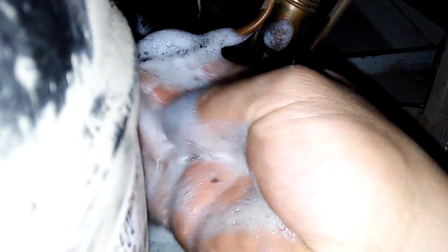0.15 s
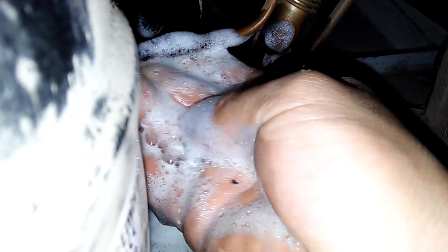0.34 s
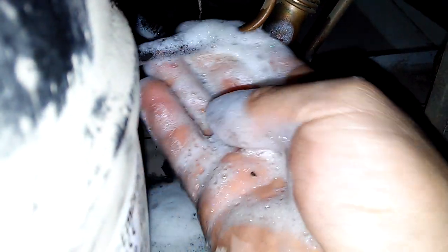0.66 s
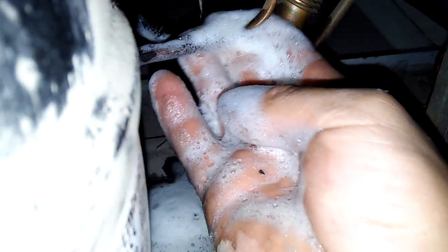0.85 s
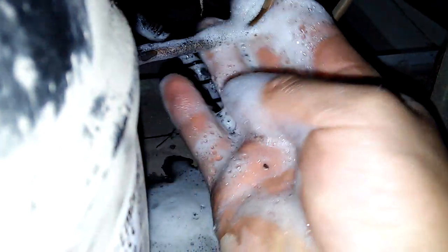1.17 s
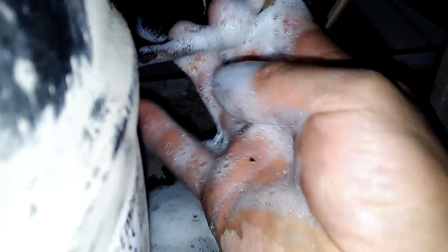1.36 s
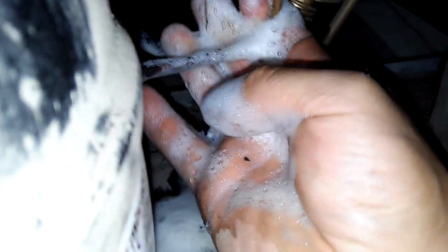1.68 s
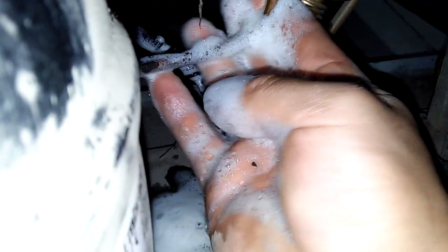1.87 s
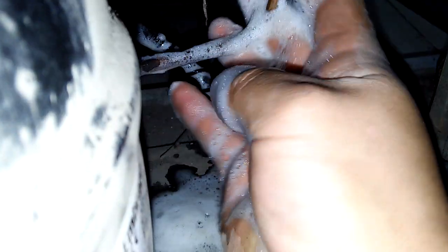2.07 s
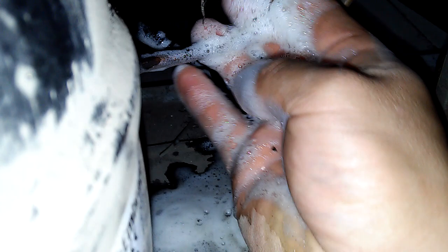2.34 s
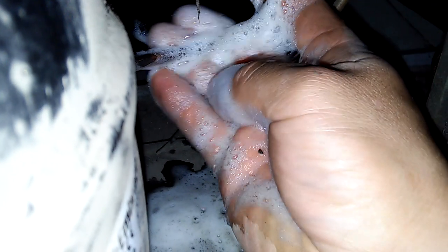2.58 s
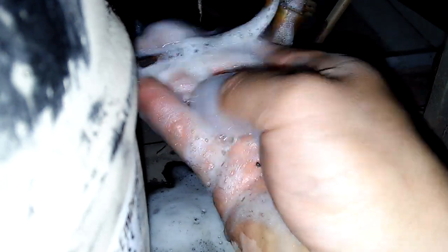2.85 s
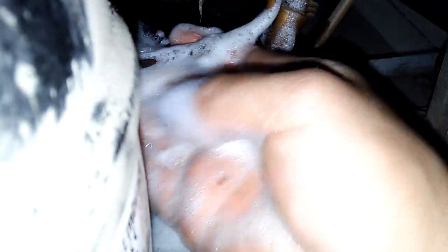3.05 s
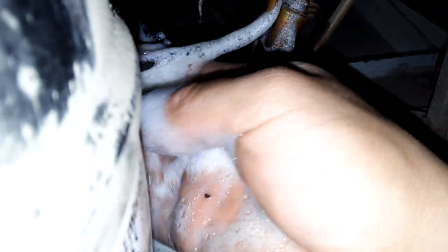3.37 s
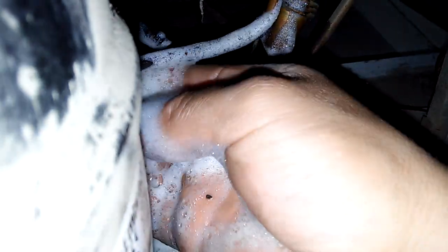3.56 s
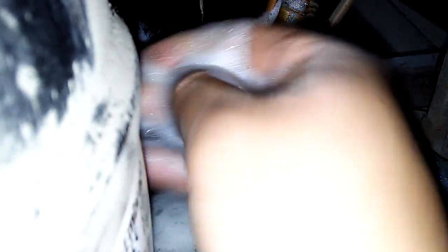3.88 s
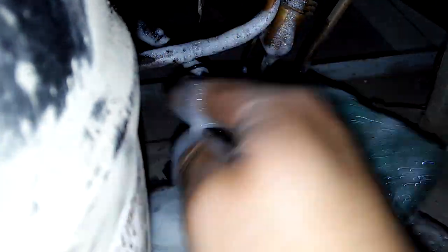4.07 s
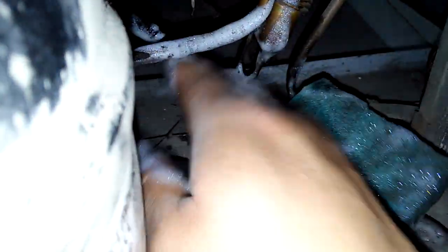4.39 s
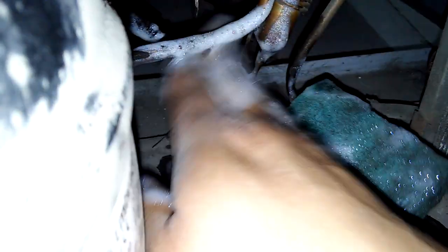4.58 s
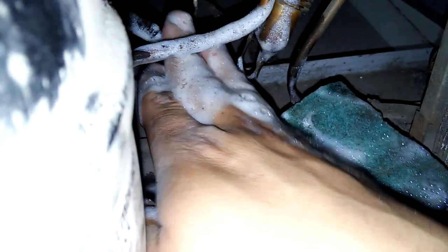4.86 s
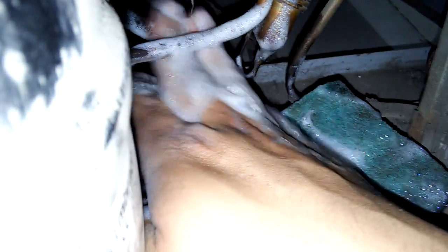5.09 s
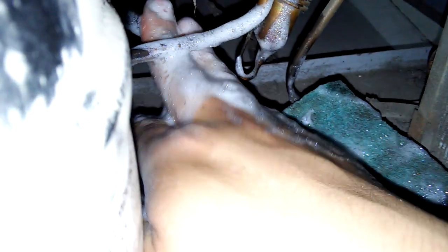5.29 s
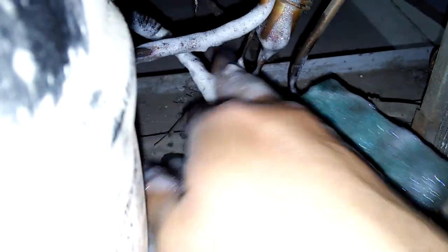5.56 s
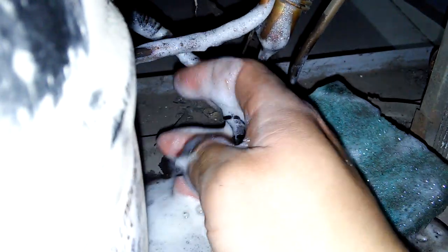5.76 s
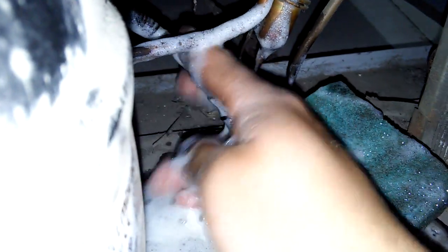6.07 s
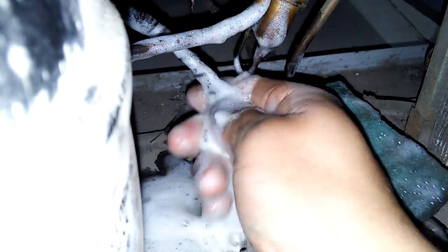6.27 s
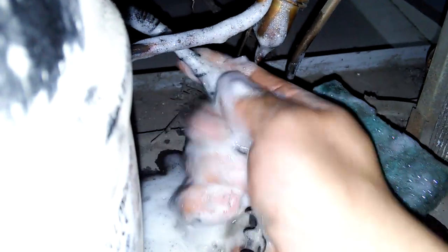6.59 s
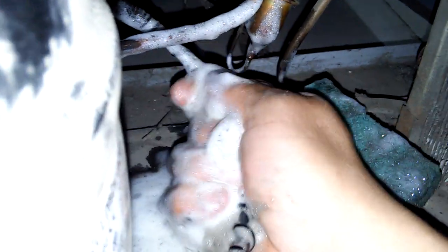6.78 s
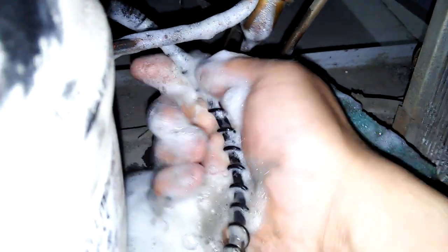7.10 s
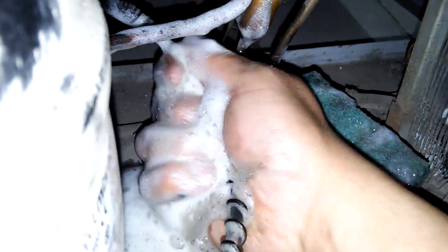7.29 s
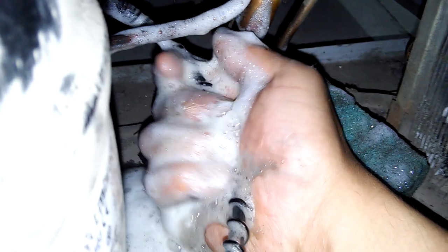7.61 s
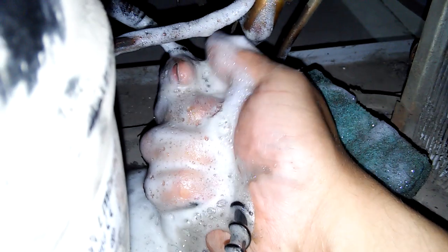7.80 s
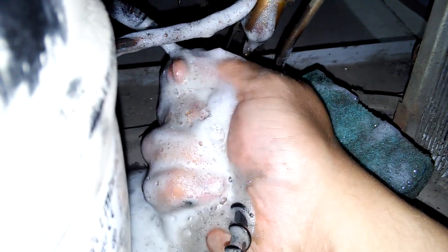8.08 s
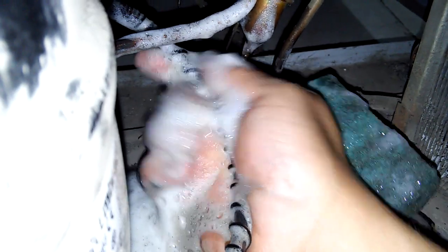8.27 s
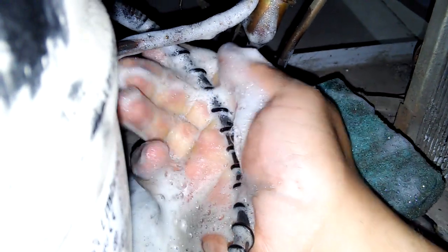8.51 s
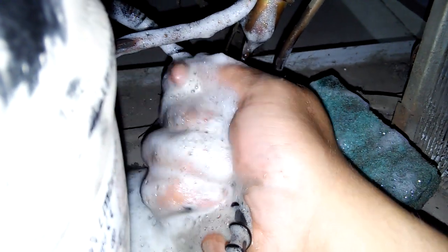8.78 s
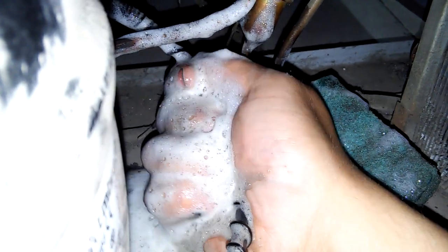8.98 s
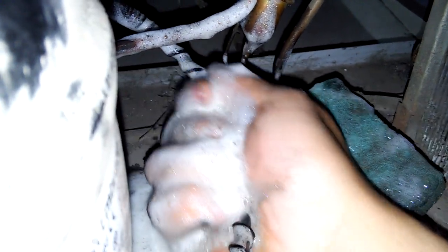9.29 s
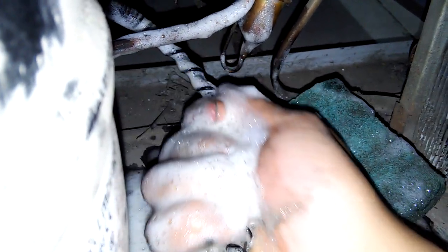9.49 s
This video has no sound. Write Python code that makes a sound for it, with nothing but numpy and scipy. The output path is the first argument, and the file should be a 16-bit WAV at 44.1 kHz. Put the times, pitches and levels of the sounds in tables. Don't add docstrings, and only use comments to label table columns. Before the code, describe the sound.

Close bright hiss of bursting suds under a rubbing hand, a hard metallic rattle early on, then softer clinks and dull distant thuds.

```python
import sys
import numpy as np
from scipy import signal
from scipy.fft import rfft, irfft, next_fast_len
from scipy.io import wavfile
from scipy.ndimage import uniform_filter1d, map_coordinates

SR = 44100
rng = np.random.default_rng(int(sys.argv[2]) if len(sys.argv) > 2 else 0)


def bounce(signal):
    frames = np.transpose(np.atleast_2d(signal))
    limited = np.clip(frames, -1, 1)
    pcm = np.round(limited * 32767).astype(np.int16)
    wavfile.write(sys.argv[1], SR, pcm)


def makeup_ratio(level_db):
    decades = np.asarray(level_db, float) / 20
    return 10 ** decades


N = 425565

# f/Hz, width/Hz, level/dB
TUBE_MODES = [(1340, 36, -9.5), (1698, 39, -12), (1783, 22, -10.5), (1993, 36, -6.5), (2340, 30, -7),
              (2503, 39, -7), (2700, 37, -9), (3030, 25, -15), (3340, 53, -2), (3940, 43, -6.5),
              (4200, 27, -12), (4950, 34, -6), (5560, 56, -15), (6480, 57, -1)]
# f/Hz, level/dB
SCRAPE_COLOUR = [(710, -17), (1200, -27), (1360, -34), (1550, -11), (1770, -4), (2140, -1.5), (4040, 8),
                 (5330, 1), (13000, 1), (15600, -32)]


def unit(x):
    return x / np.sqrt(np.mean(x ** 2) + 1e-20)


def along(points, hz):
    f, value = np.transpose(points)
    return np.interp(np.log(hz + 1), np.log(f + 1), value)


def curves(rows):
    s, *columns = np.transpose(rows)
    return [np.interp(np.arange(N) / SR, s, column) for column in columns]


def bells(rows):
    t = np.arange(0, N + 64, 64) / SR
    total = sum(high * np.exp(-((t - s) / half) ** 2) for s, high, half in rows)
    return np.interp(np.arange(N) / SR, t, total)


def wobble(rate):
    knots = rng.standard_normal(int(N * rate / SR) + 4)
    return map_coordinates(knots, [np.arange(N) * rate / SR])


def filtered(x, response):
    m = next_fast_len(N + SR // 2)
    return irfft(rfft(x, m) * response(np.fft.rfftfreq(m, 1 / SR)), m)[..., :N]


def resonance(f, hz, width):
    return 1j * f * width / (hz * hz - f * f + 1j * f * width)


def chord(f, peaks, spread_db):
    total = 0
    for k, (hz, width, level_db) in enumerate(peaks):
        strength = makeup_ratio(level_db + rng.normal(0, spread_db))
        total = total + (-1) ** k * strength * resonance(f, hz, width)
    return total


def patchy(patch_db):
    z = signal.stft(rng.standard_normal(N + 512), nperseg=512)[2]
    field = uniform_filter1d(rng.standard_normal(z.shape), size=5, axis=0)
    field = uniform_filter1d(field, size=12, axis=1)
    return unit(signal.istft(z * makeup_ratio(patch_db * unit(field)), nperseg=512)[1][:N])


def puff(t, colour, attack, t60):
    hiss = irfft(rfft(rng.standard_normal(len(t))) * colour, len(t))
    hiss = hiss * makeup_ratio(-60 * t / t60) * (1 - np.exp(-t / attack))
    return hiss / abs(hiss).max()


def gliding(x, hz, width):
    f, t, z = signal.stft(x, SR, nperseg=512)
    centre = hz[np.minimum((t * SR).astype(int), N - 1)]
    lift = makeup_ratio(-13) + abs(resonance(f[:, None], centre, width)) ** 2
    return signal.istft(z * lift, SR, nperseg=512)[1][:N]


def struck(at, db, modes, own_hz, free, attack, t60):
    out, t = np.zeros(N + SR), np.arange(SR // 2) / SR
    for s, level_db, hz, share in np.broadcast(at, db, own_hz, free):
        ring = np.zeros(len(t))
        for f, mode_db, life in [*modes, (hz, 0, t60)]:
            fade_db = 60 * t / (share * life)
            ring += makeup_ratio(mode_db + rng.normal(0, 1.0) - fade_db) * np.sin(2 * np.pi * f * t)
        ring = ring * (1 - np.exp(-t / attack))
        out[round(s * SR):][:len(t)] += makeup_ratio(level_db) * ring / abs(ring).max()
    return out[:N]


def nook(x):
    # f/Hz, t60/s
    gap_decay = [(100, 0.76), (1000, 0.31), (5000, 0.083), (15000, 0.14)]
    hz, t, z = signal.stft(rng.standard_normal(SR // 3), SR, nperseg=256)
    fade_db = -60 * t / along(gap_decay, hz)[:, None]
    tail = signal.istft(z * makeup_ratio(fade_db), SR, nperseg=256)[1]
    return signal.fftconvolve(x, tail / np.linalg.norm(tail))[:N]


def walls(x):
    # delay/s, level/dB
    surfaces = [(.00117, -13), (.00231, -11), (.00373, -11), (.00519, -12), (.00691, -13), (.00929, -15)]

    def echoes(reach):
        return filtered(x, lambda f: sum(makeup_ratio(db) * np.exp(-2j * np.pi * f * s * reach) for s, db in surfaces))

    turn = np.pi / 4 * (1 + np.tanh(2 * wobble(1.2)))
    return x + np.cos(turn) * echoes(1) + np.sin(turn) * echoes(1.137)


def shop():
    # t/s, rumble level/dB
    activity = [(0, -51), (.25, -68), (1.5, -65.5), (3.3, -62.5), (4.55, -57.5), (5.05, -63.5), (5.5, -57),
                (6.2, -57), (6.7, -50), (7.2, -51), (7.6, -52.5), (8.6, -48.5), (9.65, -47)]
    # f/Hz, level/dB
    rumble_colour = [(21, -46), (35, -11), (70, -1.5), (113, -1), (166, -5.5), (216, -14.5), (281, -14),
                     (346, -13), (377, -14), (412, -40), (480, -26), (620, -66), (1060, -120)]
    # f/Hz, level/dB
    murmur_colour = [(100, -55), (170, -5), (316, -1), (352, 1.5), (388, -2.5), (436, 1), (456, -11.5),
                     (546, -7), (670, -10), (821, -11.5), (1180, -15), (2200, -28), (2860, -59),
                     (4840, -120)]
    # f/Hz, width/Hz, level/dB
    room_modes = [(280, 3.2, -1.5), (396, 11, -5), (546, 21, 0.5), (737, 11.5, 3), (839, 30, 0.5),
                  (973, 17, 0.5), (82.6, 2.9, 4.5), (114, 12, -11), (148.3, 5.7, 1)]

    def room_sound(patch_db, colour):
        def response(f):
            standing = 1 + sum(abs(resonance(f, hz, w)) ** 2 * makeup_ratio(db) for hz, w, db in room_modes)
            return standing * makeup_ratio(along(colour, f))
        return unit(filtered(patchy(patch_db), response))

    rumble_db, = curves(activity)
    murmur_db = -62.5 + 0.36 * (rumble_db + 57.5)
    rumble = makeup_ratio(rumble_db + 2.06 * wobble(8)) * room_sound(1.0, rumble_colour)
    murmur = makeup_ratio(murmur_db + 1.3 * wobble(11.0)) * room_sound(0.67, murmur_colour)
    return rumble + murmur


def thuds():
    # t/s, peak level/dB, f/Hz
    pushes = [(.003, -39, 160), (5.515, -51, 312), (8.11, -46, 282), (8.201, -45, 280), (6.923, -66, 91),
              (7.886, -40.5, 104), (7.954, -46, 89), (8.052, -40, 129), (8.099, -39, 140), (8.273, -38, 80),
              (8.454, -47, 81.5), (8.582, -39.5, 91), (8.871, -44, 75), (9.201, -42, 147), (9.545, -36, 80)]
    s, db, hz = np.transpose(pushes)
    floor_mode = (271.5, -15.5, 0.091)  # Hz, dB, t60 s
    return struck(s, db, [floor_mode], hz, 0.96, attack=0.0055, t60=0.069)


def cabinet():
    # t/s, peak level/dB, low-mode level/dB, loudest mode f/Hz, share of the free ring time
    knocks = [(0.019, -67, 24, 940, 0.52), (1.7265, -20, -22, 795, 0.9), (1.741, -35, -29, 720, 0.6),
              (2.575, -46, -27, 780, 0.25), (2.599, -40, -8, 789, 0.89), (2.689, -47, -5, 864, 1),
              (6.489, -50.5, -13, 846, 0.96), (6.575, -52, -21, 790, 0.63), (6.653, -54.5, -18, 840, 1),
              (9.298, -50, -5, 814, 1), (9.33, -45, -1.5, 815, 1), (9.355, -44.5, -14, 790, 0.55),
              (9.425, -56, 14, 820, 0.78)]
    taps = [
        (5.52, -57, 4, 1030, 0.2),
        (6.131, -56, -3, 770, 0.4),
        (6.155, -50.5, -14, 1030, 0.18),
        (7.507, -48, -1, 745, 0.3),
    ]
    # f/Hz, level/dB, t60/s
    panel_modes = [(727, -7, 0.28), (812, -2, 0.22), (554.7, -11.5, 0.13)]
    # t/s, peak level/dB, loudest mode f/Hz
    bumps = [(0.004, -48, 139), (0.05, -60, 106), (0.759, -44, 94), (1.726, -31.5, 104), (1.767, -45, 124),
             (2.563, -34.5, 107), (2.604, -26.5, 107), (2.641, -25.5, 102.3), (2.677, -28, 111),
             (5.244, -43.5, 103), (5.319, -45.5, 102.5), (5.381, -59, 116), (5.561, -43.5, 98),
             (6.402, -43, 100.5), (6.485, -45, 92.5), (6.619, -44, 86.1), (7.315, -46, 79)]
    # f/Hz, level/dB, t60/s
    boom_modes = [(75, -15, 0.44), (97.5, -3.5, 0.55), (124, -8.5, 0.88), (160, -17, 0.33)]
    s, db, low_db, hz, free = np.transpose([*knocks, *taps])
    panel = struck(s, db + 0.5, panel_modes, hz, free, attack=0.0047, t60=0.16)
    low = struck(s, db + low_db, [(343, -20, 0.094)], 382.0, free, attack=0.0032, t60=0.16)
    s, db, hz = np.transpose(bumps)
    boom = struck(s, db, boom_modes, hz, 0.57, attack=0.0049, t60=0.5)
    return panel + low + boom


def tubing():
    # t/s, peak level/dB, loudest mode f/Hz, crunch level/dB
    rattles = [(0.767, -50, 3660, 9.5), (1.7015, -16.5, 1740, 6.5), (1.7022, -24, 5050, -7),
               (1.7102, -12.5, 4100, -7), (1.7122, -18, 1340, -4), (1.72, -11, 4040, 3.5),
               (1.724, -16.5, 2520, -4), (1.733, -21, 1960, 1), (1.7438, -26, 3870, 0),
               (1.7597, -33, 3960, -8), (2.019, -45.5, 3500, 8), (2.1914, -33.5, 4110, 3),
               (2.2084, -41, 2590, -1), (2.289, -42, 3670, -1), (2.562, -31, 4830, 5),
               (2.573, -23.5, 3380, 4), (2.586, -33, 2340, 3), (2.6121, -27.5, 2310, 6),
               (2.6167, -25.5, 3900, 3), (2.628, -34, 5300, 0), (2.65, -33, 3930, 0),
               (2.677, -28.5, 2570, 2), (2.701, -33, 3400, 6), (2.782, -39, 4380, -8),
               (4.385, -49, 2330, -4), (5.275, -42, 2350, 5), (5.283, -40.5, 3980, -1),
               (5.33, -47, 3200, 0), (5.516, -43, 4200, 5), (6.402, -42, 2230, -3), (6.412, -39, 4150, 4.5),
               (6.483, -37, 3980, -1), (6.5543, -42.5, 3280, 5), (6.575, -36, 3900, -2),
               (6.627, -44, 3900, 4), (6.6707, -46, 3100, 5), (9.305, -55, 4900, 6), (9.351, -55, 3100, 3),
               (9.42, -52, 2700, 6)]
    out, t = np.zeros(N + SR), np.arange(SR // 3) / SR
    f = np.fft.rfftfreq(len(t), 1 / SR)
    for s, db, hz, crunch_db in rattles:
        t60 = max(0.19 - 0.0028 * (db + 35.0), .03)
        modes = chord(f, TUBE_MODES, spread_db=3.0) + makeup_ratio(7.5) * resonance(f, hz, 57)
        scrape = puff(t, 1, 0.00066, 0.61 * t60)
        ring = irfft(rfft(scrape) * modes, len(t))
        crunch = puff(t, makeup_ratio(along(SCRAPE_COLOUR, f)), 0.00084, 1.35 * t60)
        rattle = ring / abs(ring).max() + makeup_ratio(crunch_db) * crunch
        out[round((s - .0015) * SR):][:len(t)] += makeup_ratio(db - 5.5) * rattle
    return out[:N]


def drags():
    slides = [
        (1.702, -52, 0.011),
        (1.824, -51.5, 0.1),
        (2.802, -56, 0.098),
        (3.855, -60.5, 0.14),
        (4.46, -62, 0.11),
        (6.53, -61, .12),
        (5.4, -63, 0.22),
        (9.397, -62, 0.11),
    ]

    def response(f):
        scrape = makeup_ratio(along(SCRAPE_COLOUR, f) - 8.5) * (f < 5500)
        return chord(f, TUBE_MODES, spread_db=3.0) + scrape

    hum = unit(filtered(patchy(patch_db=2.0), response))
    return hum * bells((s, makeup_ratio(db), half) for s, db, half in slides)


def squeak():
    # f/Hz, width/Hz, level/dB
    slip_modes = [(950, 92, -4), (1365, 70, -5), (2304, 55, 2), (3260, 50, -5)]
    slip = unit(filtered(rng.standard_normal(N), lambda f: chord(f, slip_modes, spread_db=0)))
    t = np.arange(N) / SR - 7.175
    swell_db = np.minimum(220 * t, -130 * t)
    return makeup_ratio(-54 + swell_db) * slip


def hand():
    # t/s, pressure/dB, bubble coarseness/dB, wetness/dB, pitch of the coarse bubbles f/Hz
    drift = [(0, 1.7, -4, 1, 5300), (.88, 4.5, 0.5, -2, 5900), (1.75, 4, -3, -2, 5240),
             (2.63, 3, -0.6, 0.9, 5400), (3.51, 2, 1.2, -2.5, 5230), (4.1, 2, 1.3, 0, 5400),
             (4.42, 3.5, -1.7, 3.5, 4870), (4.95, 1.5, -3.5, 3, 4400), (5.3, 3, -1, -3, 5270),
             (5.6, 1.6, 0, 3, 5800), (6.14, 0.8, 2, 2.5, 5830), (7.02, -0.3, 0.2, 4.5, 5520),
             (7.9, -8.5, -2, 5, 5300), (8.77, -5, 1.5, -7, 5700), (9.3, -2.5, 3, -8, 5650),
             (9.65, -1.5, 1, -1, 5050)]
    # middle t/s, pressure/dB, half length/s, coarseness/dB
    grips = [(0.122, -1, 0.028, 1.5), (0.22, 2, 0.049, -2), (0.733, 1.5, 0.1, -2), (1.003, -3, 0.18, -2.5),
             (1.545, -5.5, 0.13, -0.5), (1.647, -6, 0.059, 5), (2.363, -2, 0.046, 1),
             (2.48, -2, 0.13, -2.5), (2.786, 4.5, 0.027, 0), (3.03, -4.5, 0.28, 3.1),
             (3.084, -1, 0.11, 4.5), (3.367, -4.5, 0.09, 9), (3.837, 2.5, 0.18, -1), (4.68, 1, 0.13, -5),
             (4.986, -5.5, 0.19, 2.5), (5.367, -5, 0.082, 2), (5.825, -2.0, 0.1, 0.8),
             (6.058, -0.8, 0.16, -5), (6.36, -4, 0.068, 0.5), (6.542, -2, 0.099, -2.5),
             (6.777, -3, 0.1, -0.5), (7.142, -2.5, 0.073, 0), (7.37, 0.7, 0.11, -3),
             (7.593, -2.5, 0.19, -1), (8.044, 1, 0.055, 4), (8.33, 0, 0.06, -0.5), (8.43, 2, 0.12, 3),
             (8.56, -6, 0.091, 2), (8.7, 2, 0.12, -3), (9.06, 3, 0.088, -1)]
    press_db, coarse_db, wet_db, coarse_hz = curves(drift)
    s, grip_db, half, size_db = np.transpose(grips)
    press_db = press_db + bells(zip(s, grip_db, half))
    coarse_db = coarse_db + bells(zip(s, size_db, half))
    return press_db, coarse_db, wet_db, coarse_hz


def tube_hum():
    # f/Hz, width/Hz, level/dB
    wet_modes = [(2750, 350, -3), (3200, 250, 0), (3650, 300, -2)]
    hum = unit(filtered(rng.standard_normal(N), lambda f: chord(f, wet_modes, spread_db=0)))
    press_db = hand()[0]
    return makeup_ratio(-75 + 1.2 * press_db) * hum


def squirts():
    # t/s, peak level/dB, centre f/Hz, t60/s, attack/s
    spurts = [(.1455, -22, 13200, 0.45, .0005), (.1455, -25, 10800, .3, .0005),
              (0.145, -32, 7400, 0.64, .001), (.735, -27.5, 6800, 0.13, .004),
              (1.706, -13, 13400, .06, .001), (1.712, -14.5, 10300, 0.3, .001),
              (1.718, -24, 6300, 0.18, .001), (1.735, -9.5, 13700, 0.043, .001),
              (2.565, -18.5, 10250, 0.3, .001), (2.6, -21, 13000, 0.22, 0.00092),
              (2.61, -35, 6300, 0.12, .002), (2.745, -31, 6300, 0.3, .004), (4.301, -42, 4700, 1, .03),
              (5.48, -38.5, 5600, 1, 0.044), (7.6, -42, 11000, .1, .001), (7.853, -34, 14400, .3, .002),
              (8.0, -48, 7000, .4, .002), (8.0, -43, 10300, .4, .002), (8.238, -40, 7250, .5, .002),
              (8.238, -43, 10800, .5, .002), (8.595, -37, 13600, .3, .002), (8.66, -41, 7400, 0.6, .01),
              (9.04, -43, 9000, .3, .002), (9.301, -36, 10200, 1, .02), (9.38, -36, 10100, 1, .01)]
    out, t = np.zeros(N + SR), np.arange(SR // 2) / SR
    f = np.fft.rfftfreq(len(t), 1 / SR)
    for s, db, hz, t60, attack in spurts:
        colour = resonance(f, hz, 0.2 * hz) ** 3
        out[round(s * SR):][:len(t)] += makeup_ratio(db) * puff(t, colour, max(attack, 1 / SR), t60)
    return out[:N]


def foam():
    # low f/Hz, high f/Hz
    size_ranges = [
        (12600, 20100),
        (8560, 12840),
        (6000, 8470),
        (4150, 6100),
    ]
    # rest level/dB, then dB per dB of pressure, of coarseness, of wetness
    size_levels = [
        (-35.5, 1, -0.76, 0),
        (-40, 1.37, 0.13, 0.067),
        (-44.5, 1.54, 0.82, 0.089),
        (-57.5, 1.94, 0.97, 1.28),
    ]
    # f/Hz, level/dB
    foam_colour = [(880, -71), (1500, 19), (2520, -24), (3190, -1), (3840, -18), (4490, -18.5),
                   (5690, -19.5), (5970, -16), (6330, -13), (9190, -16.5), (10500, -10), (12500, -10.5),
                   (13500, -10), (14300, -11.5), (15600, -14.5)]
    # t/s, pitch f/Hz, level over the fizz/dB
    singing = [(0, 13000, 2), (.32, 13300, 1), (.45, 13900, 2), (.8, 13700, 2), (1.4, 13700, 2),
               (3.2, 13500, 0), (3.4, 13000, 0), (3.6, 13700, 1), (4.16, 13500, 2), (4.7, 14000, 2),
               (5.35, 13400, -2), (6.02, 14000, 2), (6.5, 13500, -2), (6.8, 14000, -3), (8.14, 14100, 0),
               (8.44, 13500, -1), (8.6, 14000, 0), (9.3, 13400, -2)]
    *controls, coarse_hz = hand()
    out = np.zeros(N)
    surge_db = 0.4 * wobble(5.2) + 0.61 * wobble(25)
    last = len(size_ranges) - 1
    for k, (low_hz, high_hz) in enumerate(size_ranges):
        rest_db, *follows = size_levels[k]
        level_db = rest_db + np.dot(follows, controls)
        burst = rng.random(N) < 4000 / SR
        pop_db = 2.2 * np.minimum(rng.exponential(size=N), 4)
        pops = burst * rng.standard_normal(N) * makeup_ratio(pop_db)
        films = 0.61 * unit(pops) + patchy(patch_db=2.5)

        def response(f):
            low_edge = 1 + (low_hz / (f + 1)) ** 26
            high_edge = 1 + (f / high_hz) ** 26
            return makeup_ratio(along(foam_colour, f)) / np.sqrt(low_edge * high_edge)

        ring = filtered(films, response)
        if k == 0:
            ridge_hz, ridge_db = curves(singing)
            ring = ring + makeup_ratio(ridge_db) * gliding(ring, ridge_hz, width=1300)
        if k == last:
            ring = gliding(ring, coarse_hz, width=1520)
        out += makeup_ratio(level_db + surge_db + 0.5 * wobble(14)) * unit(ring)
    out = walls(out)
    return out + makeup_ratio(-13) * nook(out)


def scene():
    far = shop() + thuds()
    near = cabinet() + tubing() + drags() + squeak() + squirts()
    mono = far + near + makeup_ratio(-10) * nook(near) + tube_hum() + makeup_ratio(-2.5) * foam()
    return np.array([mono, mono])


def low_pass(x):
    return signal.sosfilt(signal.butter(12, 17100, fs=SR, output="sos"), x)


def record(dry):
    hiss = makeup_ratio(-65.5) * rng.standard_normal(N)
    mix = filtered(dry + hiss, lambda f: f < 15730)
    return low_pass(mix)


dry = scene()
out = record(dry)
bounce(out)
```